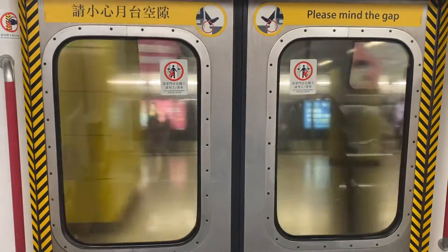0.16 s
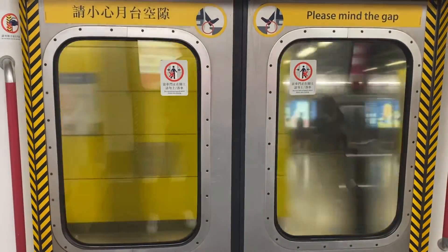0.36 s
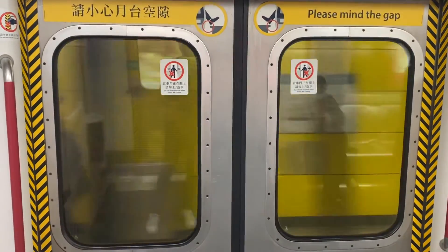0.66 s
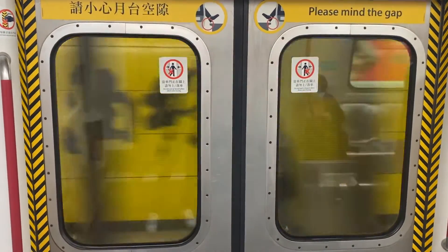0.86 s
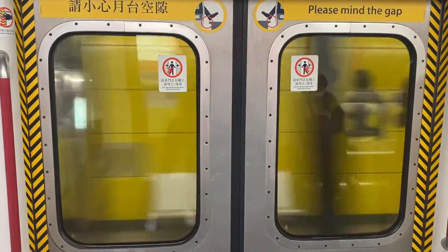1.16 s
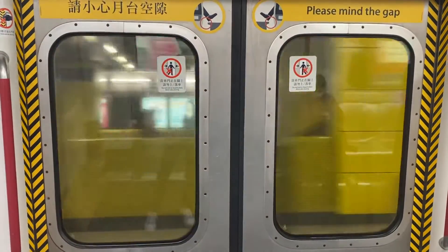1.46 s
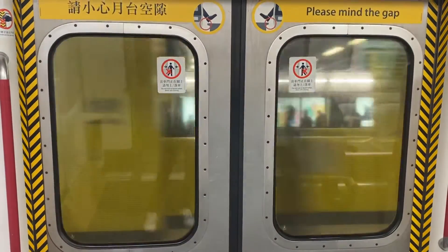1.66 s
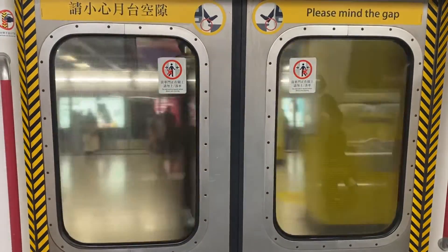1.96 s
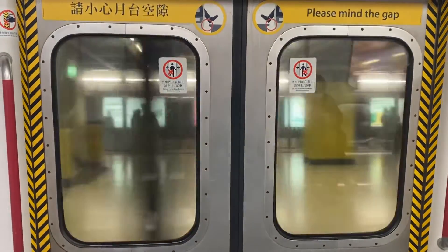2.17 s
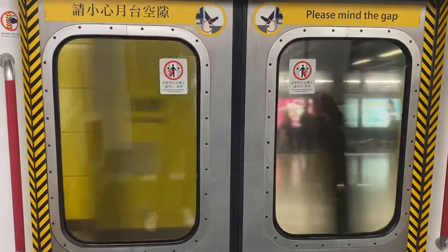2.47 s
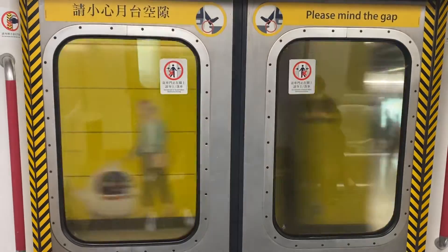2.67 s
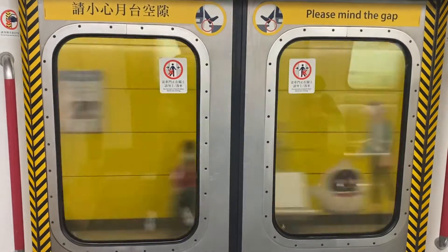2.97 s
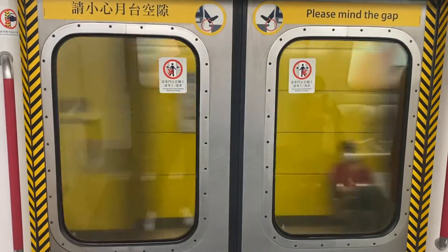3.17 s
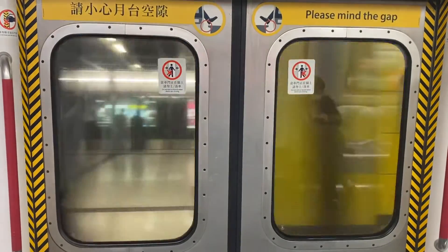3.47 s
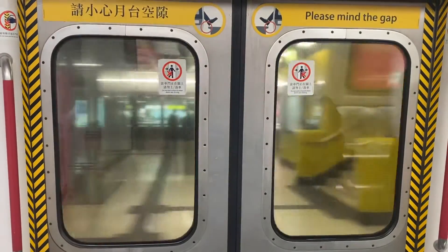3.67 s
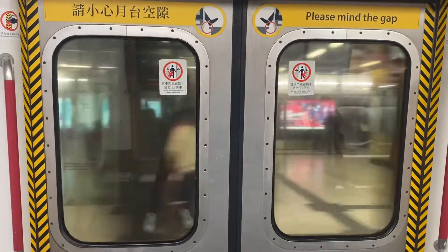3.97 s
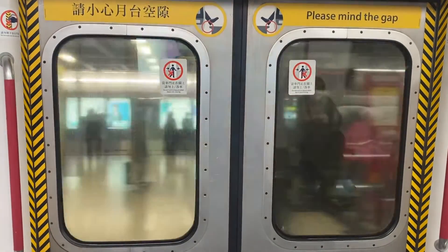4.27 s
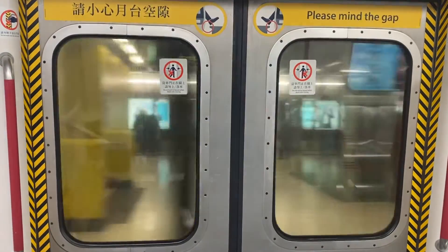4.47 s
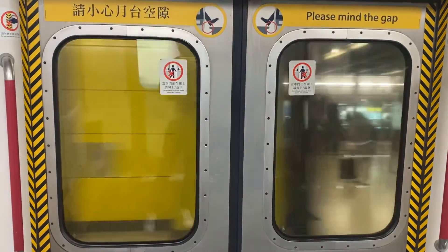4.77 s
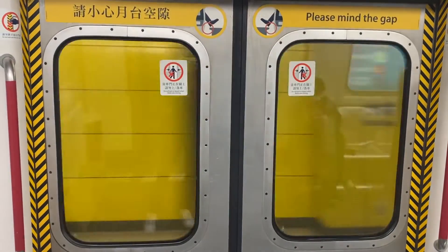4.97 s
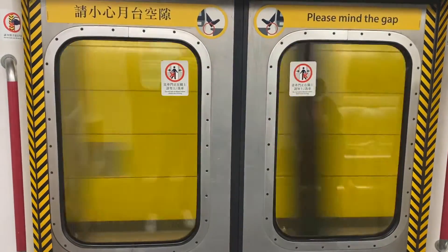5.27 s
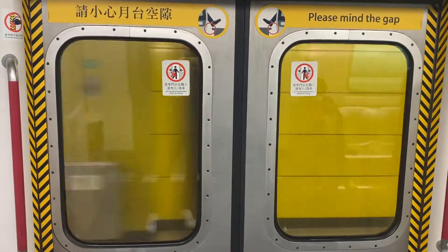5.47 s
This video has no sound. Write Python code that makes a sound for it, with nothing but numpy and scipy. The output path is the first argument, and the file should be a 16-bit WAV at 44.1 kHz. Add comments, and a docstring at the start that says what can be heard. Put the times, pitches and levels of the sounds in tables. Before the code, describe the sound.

Inside a slowing subway car, low rolling roar and floor rumble carry a sinking gear whine, axle knocks and sharp puffs of brake air.

```python
"""Inside a subway car braking along a platform, heard by a small pair of microphone ports.
Coloured noise makes the rolling roar; noise and knocks ring the low floor modes, and a panel drones.
Gears and motors whine in sines and narrow noise that sink with the speed, over an auxiliary unit's hum.
A brake valve puffs noise through its resonances, and at the end the brake shoes hiss thin and high."""
import sys
import numpy as np
from scipy import signal
from scipy.fft import rfft, irfft, next_fast_len
from scipy.io import wavfile
from scipy.ndimage import uniform_filter1d

SR = 44100
rng = np.random.default_rng(int(sys.argv[2]) if len(sys.argv) > 2 else 0)


def makeup_ratio(level_db):
    """Linear amplitude ratio for a level in decibels (20 dB per factor of ten)."""
    decades = np.asarray(level_db, float) / 20
    return 10 ** decades


def to_wav(s):
    """Save 16-bit WAV."""
    ch = np.atleast_2d(s).T  # columns
    pcm = np.round(np.clip(ch, -1, 1) * 32767)  # PCM
    wavfile.write(sys.argv[1], SR, pcm.astype(np.int16))


N = 247842  # length in samples


def evened(x):
    """Scales to rms 1."""
    return x / np.sqrt(np.mean(x ** 2) + 1e-20)


def curve(rows):
    """Columns of a table over time, one value a sample."""
    s, *columns = np.transpose(rows)
    return [np.interp(np.arange(N) / SR, s, c) for c in columns]


def read(points, hz, index=1):
    """A column of a table over log frequency."""
    table = np.transpose(points)
    return np.interp(np.log(hz + 1), np.log(table[0] + 1), table[index])


def drift(shape, size):
    """Slow random wandering of rms 1: noise smoothed twice over size samples."""
    once = uniform_filter1d(rng.standard_normal(shape), size=size)
    return evened(uniform_filter1d(once, size=size))


def bell(s, half):
    """A brief swell that crests at 1 at s seconds and is down to 1/e half seconds away."""
    return np.exp(-((np.arange(N) / SR - s) / half) ** 2)


def resonate(x, hz, width):
    """A resonance on a fixed or gliding pitch: shifts it down to zero, smooths twice, shifts back."""
    turn = np.exp(2j * np.pi * np.cumsum(hz * np.ones(N)) / SR)
    r = np.exp(-np.pi * abs(width) / SR)
    smooth = signal.lfilter([(1 - r) ** 2], [1, -2 * r, r * r], x / turn)
    return 2 * (turn * smooth).real


# likeness of the sound field at the two ports: f/Hz, likeness/0-1
PORT_LIKENESS = [(30, .995), (160, .94), (250, .9), (430, .78), (650, .1), (1600, .05), (2400, .62),
                 (4500, .72), (5500, .6), (6300, .8), (6800, 1), (16000, 1)]


def air_noise(shape_db):
    """Noise at two ports, alike as far as the sound field allows; shape_db(hz, s) colours it."""
    frames, hz = N // 512 + 6, np.fft.rfftfreq(2048, 1 / SR)[:, None]
    a, b, c, d = rng.standard_normal((frames, len(hz), 4)).T
    same = np.clip(read(PORT_LIKENESS, hz), 0, 1)
    left, other = a + 1j * b, c + 1j * d
    z = np.array([left, same * left + np.sqrt(1 - same ** 2) * other])
    z *= makeup_ratio(shape_db(hz, np.arange(frames) * 512 / SR))
    return evened(signal.istft(z, nperseg=2048, noverlap=1536)[1][:, :N])


def white():
    """Flat noise at two ports."""
    return air_noise(lambda hz, s: 0 * hz)


# colour of rolling noise and air in the car: f/Hz, relative level/dB per Hz, loss by the end/dB
ROLLING_COLOUR = [(20, -22, -3), (40, -2, 1.5), (132, -1.5, 4), (347, -2, -2.5), (453, -6.5, -0.5),
                  (593, -4, 2), (608, 1.5, 9), (736, -2.5, 8), (920, -10.5, 4), (1300, -12.5, 2.5),
                  (1535, -17.5, 2), (2126, -19.5, 3), (3450, -31, 2), (5340, -36, 2), (6070, -40.5, 1),
                  (8900, -44.5, 3), (10800, -48.5, 3), (13000, -56.5, 1.5), (14300, -54, 1),
                  (15200, -63.5, -2.5), (16000, -72, 5)]


def roar(level_db=-26.5, patchy_db=1.15):
    """Rolling noise drifts in patches and mostly fades with the speed."""
    patches = rng.standard_normal((N // 512 + 6, 1025)).T
    patches = uniform_filter1d(patches, size=16, axis=0)  # across frequency
    patches = evened(uniform_filter1d(patches, size=8, axis=1))  # across time

    def slowing(hz, s):
        lost_db = read(ROLLING_COLOUR, hz, index=2) * s * SR / N
        return read(ROLLING_COLOUR, hz) - lost_db + patchy_db * patches
    return makeup_ratio(level_db) * air_noise(slowing)


# slow swells of the floor and bogie: t/s, level/dB
BOOM_SWELLS = [(0, -33), (.55, -29.5), (1.15, -26.5), (1.6, -30), (2.5, -24), (3.1, -27), (3.42, -25),
               (3.8, -28.5), (4.4, -24.5), (4.62, -28), (4.9, -25.5), (5.2, -29.5), (5.62, -26)]
# low modes of floor and bogie: f/Hz, width/Hz, relative level/dB
BOOM_MODES = [(36.6, 9, -12), (56.4, 15, -2), (86.55, 24, 1), (238.8, 15, -17.5)]
# axles jolting the floor, mostly in pairs: t/s, level at the crest/dB
AXLE_JOLTS = [(.2, -17), (0.441, -22), (1.11, -17.5), (1.351, -19.5), (1.87, -19.5), (2.001, -23),
              (2.532, -25.5), (3.382, -18.5), (3.63, -17), (4.651, -23.5), (5.011, -15.5), (5.312, -16)]


def boom():
    """Rail roughness shakes the low modes of the floor, and jolts make them ring."""
    def ring_modes(x):
        return sum(makeup_ratio(db) * evened(resonate(x, hz, width)) for hz, width, db in BOOM_MODES)
    rumble = evened(ring_modes(white()))
    knock, blows = np.zeros(N), np.zeros(N)
    knock[0] = 1
    ring = ring_modes(knock)[:SR // 2]
    s, db = np.transpose(AXLE_JOLTS)
    blows[np.round(s * SR).astype(int)] = makeup_ratio(db)
    jolts = signal.oaconvolve(blows, ring / abs(ring).max())[:N]
    return makeup_ratio(curve(BOOM_SWELLS)[0]) * rumble + jolts


# swells of the floor panel's drone: t/s, level/dB
PANEL_DRONE = [(0, -45), (.6, -36.5), (1.4, -38.5), (2.2, -39), (3.2, -41), (3.4, -30.5), (4.0, -37.5),
               (4.4, -37.5), (4.85, -36.5), (5.1, -42), (5.62, -32.5)]


def drone(hz=167, width=20):
    """A floor panel drones: noise through one narrow resonance, swelling and sinking."""
    return makeup_ratio(curve(PANEL_DRONE)[0]) * evened(resonate(white(), hz, width))


# gear mesh as the train slows (the smeared gear orders follow it too): t/s, f/Hz
GEAR_MESH = [(0, 356.6), (1.8, 331), (2.6, 322), (3.8, 303.3), (4.4, 294), (5.62, 283)]
# loudness of the gears: t/s, nearest gear's clean tone level/dB, other gears' blur level/dB
GEAR_LEVELS = [(.03, -30, -33), (.12, -39, -33), (.7, -39, -34), (1.2, -38, -33), (1.65, -38, -33),
               (2.05, -36, -32), (2.28, -22, -31), (2.65, -26, -30), (2.88, -28, -32), (3.0, -38, -32),
               (3.35, -38, -32), (3.6, -30, -32), (3.68, -22, -31), (3.83, -19, -31), (3.98, -26, -32),
               (4.12, -25, -33), (4.42, -27, -33), (4.5, -36, -33), (4.7, -38, -31), (5.25, -40, -33),
               (5.62, -41, -32)]
# brief throbs of the gear whine: t/s, level at the crest/dB, f/Hz, crest to 1/e/s
GEAR_THROBS = [(.04, -19.5, 360, .035), (.222, -18.5, 366, .022), (.36, -25, 372, .025),
               (.455, -21, 358, .022), (.55, -25, 350, .04), (0.708, -18, 358, .024), (.89, -24, 354, .03),
               (1.028, -19.5, 368, .017), (1.185, -19.5, 357, .026), (1.52, -21.5, 342, .045),
               (1.87, -22.5, 332, .055), (2.01, -24, 328, .025), (2.165, -19, 326, .022),
               (2.57, -23, 322, .03), (3.025, -20.5, 326, .03), (3.27, -23, 316, .035),
               (3.52, -20.5, 308, .04), (4.051, -16.5, 303, .028), (4.53, -22, 298, .03),
               (5.42, -16, 288, .045)]


def gears(blur_hz=22, above=1.04, right_turns=0.085):
    """A clean mesh tone and brief throbs beside a blur of other axles' gears, whose wheels differ a little."""
    mesh, t = curve(GEAR_MESH)[0], np.arange(N) / SR
    clean_db, blur_db = curve(GEAR_LEVELS)

    def sine(turns):
        at_ports = turns + np.array([[0], [right_turns]])  # the right port runs ahead
        return np.sqrt(2) * np.sin(2 * np.pi * at_ports)
    tone = sine(np.cumsum(mesh) / SR + rng.random())
    blur = evened(resonate(white(), above * mesh, blur_hz))
    throbs = sum(makeup_ratio(db) * bell(s, half) * sine(hz * t) for s, db, hz, half in GEAR_THROBS)
    return makeup_ratio(clean_db) * tone + throbs + makeup_ratio(blur_db) * blur


# smeared gear orders: multiple of the mesh, width/Hz, level/dB, loss by the end/dB
GEAR_ORDERS = [(1.08, 41, -33.5, 6.5), (2.0, 40, -44, 7), (3.07, 98, -38.5, 6), (4.06, 28, -47.5, 8),
               (15.4, 330, -64.5, -1)]
# sinking slot whine of the motors, brighter now and then: t/s, f/Hz, relative level/dB
SLOT_GLIDE = [(0, 4400, -.5), (.7, 4330, -.5), (1.2, 4230, 1), (1.65, 4130, 1.5), (1.9, 4060, 0),
              (2.44, 3990, .5), (3.2, 3830, 0), (3.72, 3760, 0.5), (4.3, 3634, -2.5), (4.62, 3570, -3),
              (4.69, 3545, 0), (4.75, 3540, -3.5), (5.2, 3480, -2.5), (5.62, 3390, -2)]
# its core, upper flank and overtones: multiple, width/Hz, level/dB
SLOT_PARTS = [(1, 220, -55), (1.04, 420, -56.5), (2, 600, -68.5), (3, 900, -74.5)]


def whine(swell_db=1.2, wander_hz=20, flutter_db=1.1):
    """Gear orders swell and motor slot tones wander and flutter, smeared by many motors and the tunnel."""
    mesh, stir, out = curve(GEAR_MESH)[0], white(), 0
    for k, width, db, lost_db in GEAR_ORDERS:
        level_db = db - lost_db * np.arange(N) / N + swell_db * drift(N, 5000)
        out = out + makeup_ratio(level_db) * evened(resonate(stir, k * mesh, width))
    slot, slot_db = curve(SLOT_GLIDE)
    wander, flutter = drift((2, N), 2500)
    slot, slot_db = slot + wander_hz * wander, slot_db + flutter_db * flutter
    for k, width, db in SLOT_PARTS:
        out = out + makeup_ratio(db + slot_db) * evened(resonate(stir, k * slot, width))
    return out


# steady tones of an auxiliary unit: f/Hz, level/dB
HUM_TONES = [(260, -43), (775.2, -47), (1820, -61), (2079, -60), (2339, -64), (2600, -63)]
# brief swells of the hum near 1.8 kHz: t/s, level at the crest/dB, f/Hz
HUM_CRESTS = [(1.52, -53, 1830), (2.19, -48.5, 1824), (4.36, -55, 1820)]


def hum(waver_hz=0.76, swell_s=0.059):
    """Very narrow noise bands make tones that waver slowly; sines swell briefly beside one of them."""
    stir, t = white(), np.arange(N) / SR
    steady = sum(makeup_ratio(db) * evened(resonate(stir, hz, waver_hz)) for hz, db in HUM_TONES)
    swells = sum(makeup_ratio(db) * bell(s, swell_s) * np.sqrt(2) * np.sin(2 * np.pi * hz * t)
                 for s, db, hz in HUM_CRESTS)
    return steady + swells


# puffs of air: t/s, levels of whistle, hiss, bright top and low body/dB, rise/s, t60 of whistle and body/s
AIR_PUFFS = [(.648, -56, -45.5, -75, -43, .01, .36), (2.7555, -35.5, -42.5, -43, -60, .001, .72),
             (3.652, -75, -62, -53, -75, .001, .15)]
# whistling resonances of the valve: f/Hz, width/Hz, relative level/dB
VALVE_WHISTLE = [(4740, 760, 1), (5700, 1000, -7), (6450, 700, -1)]
# ringing of the valve's metal body under the jet: f/Hz, width/Hz, relative level/dB
VALVE_METAL = [(4613, 60, -1), (4904, 60, 0), (5103, 40, -4), (5297, 45, -4), (5733, 80, -6),
               (6191, 40, -5), (6378, 70, -3), (6471, 70, -4), (6761, 50, -5), (7015, 70, -8)]
# colour of the hiss: f/Hz, relative level/dB per Hz
PUFF_HISS = [(2500, -47), (4200, -22), (4600, -6), (7500, -5), (9000, -3), (10500, -8), (13000, -21.5),
             (16500, -41.5)]
# colour of the bright top: f/Hz, relative level/dB per Hz
PUFF_TOP = [(7000, -45), (9500, -2), (10500, -1), (11500, -5), (13000, -1.5), (14800, -2.5), (16500, -22.5)]


def valve(ragged_db=1.8, ring_share=.3, snap=.35, snap_s=.015):
    """Escaping air whistles: the valve snaps open, the pressure falls and the brightest part dies first."""
    air = white()
    whistle = evened(sum(makeup_ratio(db) * resonate(resonate(air, hz, width), hz, width)
                         for hz, width, db in VALVE_WHISTLE))
    ring = evened(sum(makeup_ratio(db) * evened(resonate(air, hz, width)) for hz, width, db in VALVE_METAL))
    whistle = evened((1 - ring_share) * whistle + ring_share * ring)
    body = evened(resonate(air, 3700, 900))  # centre and width in Hz
    hiss = air_noise(lambda hz, s: read(PUFF_HISS, hz))
    top = air_noise(lambda hz, s: read(PUFF_TOP, hz))
    out = 0
    for s, whistle_db, hiss_db, top_db, body_db, rise, t60 in AIR_PUFFS:
        t = np.maximum(np.arange(N) / SR - s, 0)
        fall_db = 60 * t / t60
        jet = makeup_ratio(whistle_db - fall_db) * whistle + makeup_ratio(body_db - fall_db) * body
        jet = jet + makeup_ratio(hiss_db - fall_db / 0.85) * hiss  # the hiss falls faster,
        jet = jet + makeup_ratio(top_db - fall_db / 0.5) * top  # the top twice as fast
        opening = (1 - np.exp(-t / rise)) * (1 + snap * np.exp(-t / snap_s))
        out = out + opening * jet
    ragged = evened(uniform_filter1d(rng.standard_normal(N), size=300))  # the jet sputters
    return makeup_ratio(ragged_db * ragged) * out


# thin high hiss as the shoes bite: t/s, upper band level/dB, lower band level/dB
SHOE_BANDS = [(5.4, -80, -85), (5.435, -58, -75), (5.48, -61, -68), (5.52, -66, -61), (5.56, -68, -63),
              (5.62, -69, -66)]


def shoes(upper_hz=14900, lower_hz=14150, width=420):
    """Two bands of friction hiss; the lower one takes over."""
    rub, (upper_db, lower_db) = white(), curve(SHOE_BANDS)
    upper = makeup_ratio(upper_db) * evened(resonate(rub, upper_hz, width))
    lower = makeup_ratio(lower_db) * evened(resonate(rub, lower_hz, width))
    return (np.arange(N) > SHOE_BANDS[0][0] * SR) * (upper + lower)


def scene():
    """All that sounds in the car."""
    return roar() + boom() + drone() + gears() + whine() + hum() + valve() + shoes()


def roll_off(x):
    """The treble ends steeply here."""
    return signal.sosfilt(signal.butter(12, 15670, fs=SR, output="sos"), x)


# level of the left port over the right: f/Hz, level/dB
PORT_BALANCE = [(100, 1), (200, 1.4), (380, .6), (700, 1.2), (1300, .5), (2400, 1.2), (4400, 2),
                (6500, 0.034)]
# phase lead of the right port over the left: f/Hz, lead/turns
PORT_LEAD = [(1800, 0), (3000, -.07), (5500, 0), (6900, 0), (15550, 2), (20000, 3)]


def record(dry):
    """The ports differ in level and phase, and the high treble reaches the right one first."""
    size = next_fast_len(N + 2048)
    hz = np.fft.rfftfreq(size, 1 / SR)
    # each port takes half of the lead and half of the balance
    lead = np.exp(1j * np.pi * np.interp(hz, *np.transpose(PORT_LEAD)))
    half = makeup_ratio(read(PORT_BALANCE, hz) / 2)
    ports = irfft(rfft(dry, size) * np.array([half / lead, lead / half]), size)[:, :N]
    return roll_off(ports)


dry = scene()
out = record(dry)
to_wav(out)
```